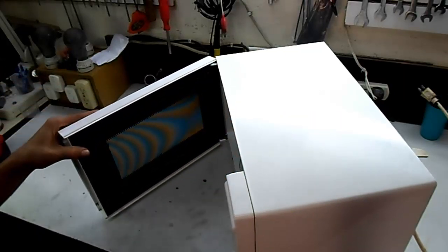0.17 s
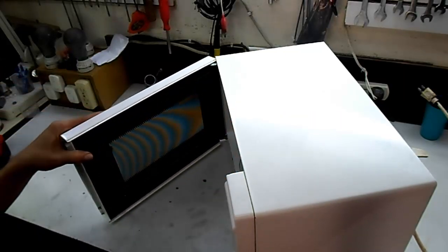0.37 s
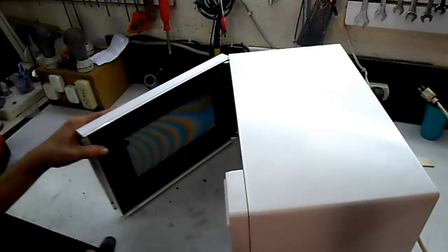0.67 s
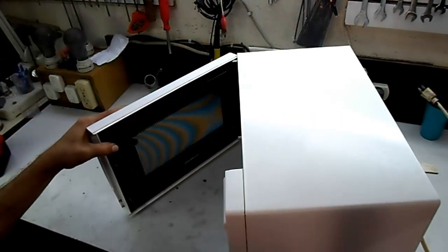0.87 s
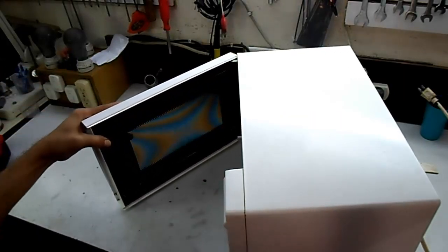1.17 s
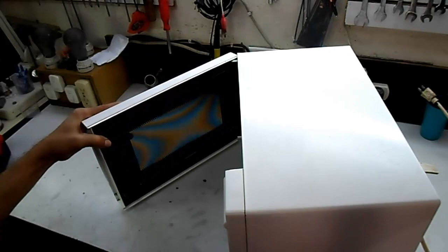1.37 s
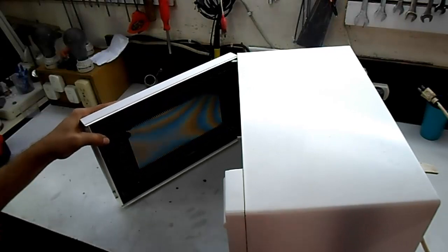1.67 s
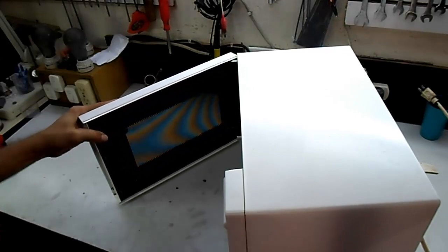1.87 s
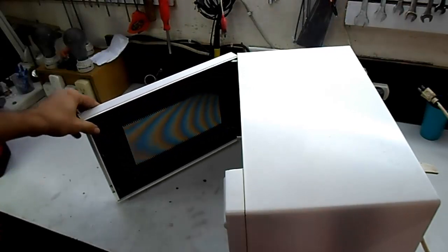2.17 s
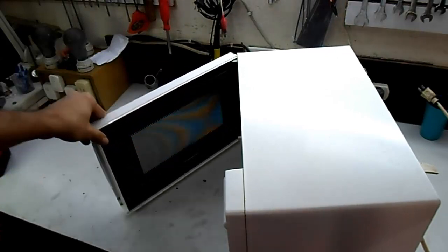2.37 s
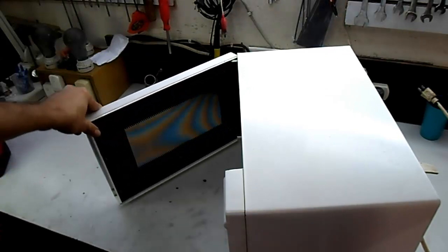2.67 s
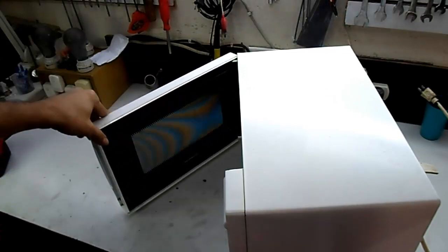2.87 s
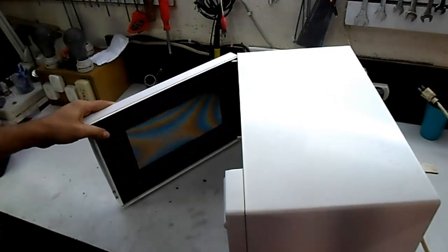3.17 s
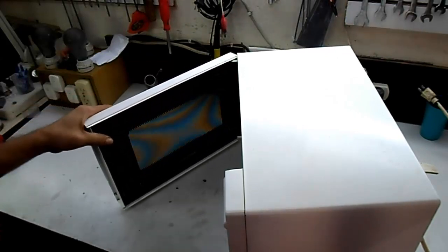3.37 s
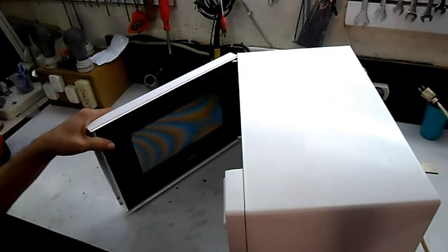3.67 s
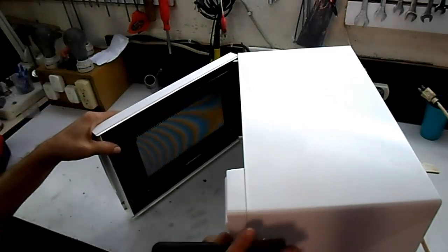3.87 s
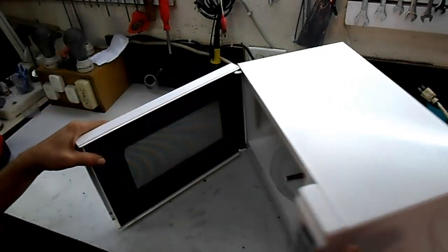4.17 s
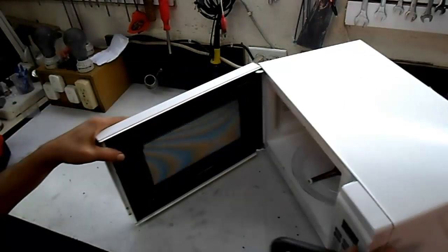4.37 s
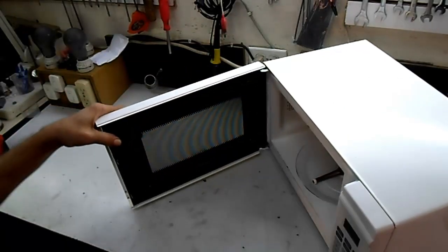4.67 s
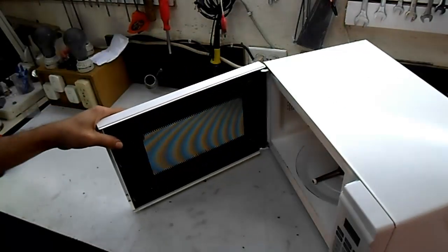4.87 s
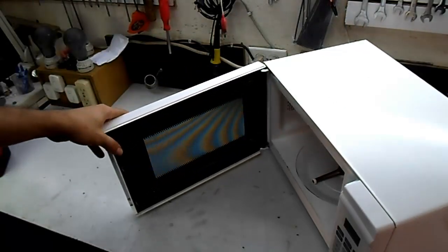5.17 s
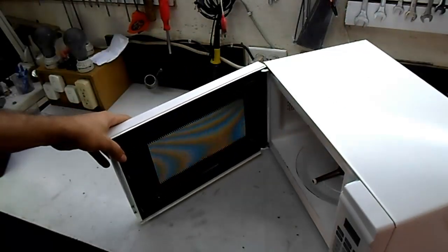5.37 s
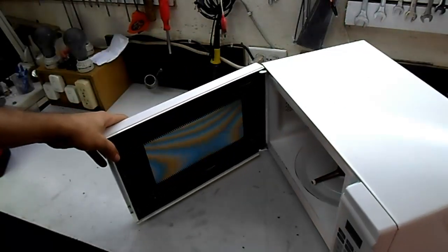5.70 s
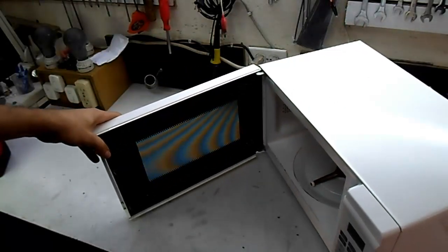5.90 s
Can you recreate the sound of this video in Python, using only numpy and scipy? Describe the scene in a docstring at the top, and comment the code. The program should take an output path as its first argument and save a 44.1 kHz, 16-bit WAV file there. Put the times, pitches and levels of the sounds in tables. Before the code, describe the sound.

A loose microwave door is worked back and forth on a workbench, with hollow low clunks, rattling panels, plastic clicks and gritty sliding.

```python
"""A microwave oven with a loose door is handled on a workbench in a small workshop.
Each clunk of the door is a short judder of blows that rings decaying modes of its panel and hollow case.
Hard plastic and latch parts click in bursts of coloured noise; dry rasps are noise in a narrow resonance.
Things rub and slide as the oven is turned: dense tiny slips, shaped by the speed of each slide.
A short diffuse echo surrounds it; a close, hissy microphone hears it over a low room rumble."""
import sys
import numpy as np
from scipy import signal
from scipy.fft import rfft, irfft, next_fast_len
from scipy.io import wavfile
from scipy.ndimage import uniform_filter1d

SR = 44100
rng = np.random.default_rng(int(sys.argv[2]) if len(sys.argv) > 2 else 0)


def to_wav(s):
    """Save 16-bit WAV."""
    ch = np.atleast_2d(s).T  # columns
    pcm = np.round(np.clip(ch, -1, 1) * 32767)  # PCM
    wavfile.write(sys.argv[1], SR, pcm.astype(np.int16))


N = 266187
TIME = np.arange(N) / SR
RING = TIME[:SR]  # one second for a blow to die away

# Resonances; columns: pitch_hz, level_db (relative), t60_s (time to fall by 60 dB)
# door panel and hollow case
BODY_MODES = [(82.66, -13, 0.84), (122.4, -3.5, 0.47), (141.2, -9.5, 0.26), (157.9, -4, 0.39),
              (199.6, -5, 0.29), (215.3, -5, 0.2), (231, -6.5, 0.24), (246.6, -5.5, 0.11),
              (286.1, 1.5, 0.11), (325.3, -4.5, 0.16), (343.3, -3.5, 0.11), (370, -18, 0.57),
              (433, -28, 0.16), (462, -5.5, 0.25), (487, -21, 0.19), (520, -21, 0.39), (560, -21, 0.11),
              (592, -13, 0.62), (669, -14, 0.28), (702, -25, 0.32), (810, -28, 0.45)]
# thin sheet-metal cover
COVER_MODES = [(800, -6, .2), (870, -4, .25), (1108, -7, .18), (1202, -7, .15), (1297, -7, .14),
               (1352, -3, .15), (1457, -6, .15), (1570, -7, .14), (1640, -5, .1), (1803, -7, .16),
               (2190, -9, .1)]
# metal latch
LATCH_MODES = [(4470, 5, .06), (4890, 8, .09), (4640, 1, 0.2), (5230, -9, 0.09), (5380, -1, 0.11),
               (6300, -1, .04), (9150, -3, .1), (9900, 3, .06), (10100, 10, 0.045), (12100, 7, 0.067),
               (12950, -2, .12)]

# Spectra, relative since the noise is levelled afterwards; columns: pitch_hz, level_db (per Hz)
# low rumble of the room
ROOM_TONE = [(10, 2), (27, 3.5), (50, -10), (62, 2), (85, -14), (120, -21), (250, -21.5), (500, -23.5),
             (1000, -27.5), (2000, -34), (4000, -41.5), (16000, -68)]
# fine hiss of a slide, also used for the microphone hiss
HISS_TONE = [(400, -5), (1500, -2.5), (3000, 0.5), (5200, -0.5), (6800, 0.5), (8800, 5), (10000, 1),
             (13000, 1), (16000, -6)]
# coarse, grainy scrape of a slide
SCRAPE_TONE = [(110, -18), (200, -5), (450, 6.5), (800, 2), (1300, 1), (2000, 0), (2500, -4), (3300, -10.5),
               (6000, -26.5), (16000, -53)]
# slips in the hinge
SHUDDER_TONE = [(40, -7.5), (200, 4), (400, -2), (550, -2.5), (3000, -29)]
# rattle of the thin panels
RATTLE_TONE = [(110, -18), (200, 5), (350, 2), (600, 3.5), (850, -5.5), (1100, -9.5), (1600, -12),
               (2400, -18.5), (3200, -23), (4500, -42), (9000, -31), (16000, -50)]
# sharp tick of hard parts
TICK_TONE = [(500, -43), (2000, 10), (4000, 8.5), (6500, 4.5), (9000, 14.5), (13000, 7), (16000, 1)]
# echo from bench and walls
ECHO_TONE = [(60, -35), (300, -5), (700, 3), (2000, -7.5), (16000, -8.0)]
# hollow clack around its own pitch; columns: pitch_multiple (ratio), level_db (per Hz)
CLACK_TONE = [(.15, -31), (.4, -1), (.75, 3.5), (1.3, -0.5), (1.9, -8), (2.7, -13.5), (4.5, -24), (14, -56)]

# Events; their levels are relative, trimmed again in the mix
# door and feet slide; columns: top_speed_s, speeding_up_s, slowing_down_s,
# fine_hiss_db, coarse_scrape_db, panel_shudder_db
SLIDES = [(.11, 0.17, 0.12, -35.5, -29, -43), (.23, 0.12, 0.055, -37, -28.5, -45),
          (.36, 0.076, 0.13, -40.5, -37, -24.5), (.6, 0.19, 0.16, -38, -48, -43),
          (.96, 0.11, 0.086, -37, -38.5, -43), (1.06, 0.059, 0.044, -53, -33, -37.5),
          (1.38, 0.32, 0.054, -44, -40.5, -35.5), (1.48, 0.058, .05, -43, -46, -34.5),
          (1.62, 0.13, 0.085, -39, -67, -44.5), (1.87, 0.16, .12, -40, -43, -39),
          (2.26, 0.086, .04, -46, -61, -60), (2.369, 0.073, 0.069, -38.5, -31.5, -28),
          (2.7, 0.23, 0.19, -53.5, -52, -42), (3.03, 0.039, 0.098, -48, -46, -44),
          (3.21, 0.033, 0.076, -40.5, -33, -23), (3.4, .08, 0.43, -51, -62, -36.5),
          (3.7, 0.13, 0.15, -43.5, -41.5, -62), (4.068, 0.23, 0.12, -42.5, -52.5, -55),
          (4.26, 0.2, 0.19, -49, -40, -30), (4.4, 0.19, 0.26, -35, -34.5, -51),
          (4.78, 0.3, 0.12, -37, -38.5, -31.5), (4.87, 0.084, 0.061, -36, -30.5, -27),
          (5.07, 0.099, 0.066, -48, -60, -37), (5.34, 0.23, 0.099, -44, -44, -36),
          (5.55, 0.082, .09, -50.5, -65, -39.5), (5.68, 0.024, .11, -66, -65, -34.5),
          (5.99, 0.092, .15, -49, -49.5, -43.5)]
# the door clunks and judders in its hinge; columns: start_s, level_db, swell_s, length_s,
# contact_hz (pitch the contact favours), reach_octaves, case_thud_db, frame_knock_db, panel_rattle_db
CLUNKS = [(.001, -10, 0.00078, 0.026, 291, 1.0, -20, -2.5, -20),
          (0.074, -17, .001, 0.037, 255.5, .3, -30, -4, -32),
          (0.171, -18, .001, 0.053, 227.7, .13, -28, 4.5, -27.5),
          (0.302, -7, 0.014, 0.046, 274.5, .45, -5, -4.5, -16.5),
          (0.401, -14, .001, 0.061, 263.2, 0.18, 0.5, -18, -28),
          (0.647, -24.5, 0.00093, 0.15, 235, 0.32, -22, -10, -58),
          (0.914, -12.5, 0.00082, 0.044, 227, 0.1, -13, -6.5, -28),
          (1.232, -14.5, 0.0033, 0.038, 250.3, 0.43, -20, 3, -27.5),
          (1.321, -23, 0.00072, .065, 228, 0.13, -5.5, -17, -50),
          (1.854, -18, 0.02, 0.034, 270, 0.08, -24, -40, -24),
          (2.284, -8, 0.041, 0.082, 260.6, 0.47, -4.5, -15, -21.5),
          (2.631, -32, .001, 0.018, 245, 0.17, -14, 1, -49),
          (3.166, -5, 0.00086, 0.058, 259.4, .35, -7, -4, -19),
          (3.277, -16, .001, 0.012, 169.2, 0.11, -20, -24, -35),
          (3.525, -25.5, .001, 0.019, 247, 0.6, -10, -11, -35),
          (4.126, -22.5, 0.00087, 0.047, 213, 0.56, -7, -11, -24.5),
          (4.591, -24.5, 0.025, 0.11, 215.5, .2, -15, -29, -53),
          (4.693, -14.5, 0.015, 0.036, 202.4, 0.069, -28, -8.5, -34),
          (4.783, -11, 0.022, .045, 208, 0.26, -10, -17, -23),
          (4.915, -24.5, 0.00093, 0.087, 206, 0.48, 0.5, -9, -38.5),
          (5.262, -23.5, 0.0091, 0.071, 196.5, .5, -6, 3, -31),
          (5.299, -8.5, 0.014, 0.047, 195.6, 0.14, -16.5, -9.5, -26)]
# hard parts tap each other; columns: start_s, clack_db, clack_hz, tick_db
CLICKS = [(.316, -20, 780, -37), (.635, -31, 780, -39), (0.791, -34.5, 825, -41), (1.143, -32, 970, -29),
          (1.17, -39, 1010, -38), (2.049, -45, 1100, -35.5), (2.152, -66, 1500, -39.5),
          (2.263, -43, 1300, -33.5), (2.718, -31.5, 1224, -42), (2.866, -34, 1376, -42),
          (3.166, -28.5, 890, -60), (3.338, -40, 1310, -44), (3.626, -64, 990, -40),
          (3.651, -37.5, 850, -61), (3.669, -33.5, 1210, -31), (3.746, -36.5, 910, -37.5),
          (4.126, -22.5, 1310, -48), (4.155, -27, 1290, -52), (4.445, -29.5, 1380, -60),
          (5.078, -41, 900, -33), (5.192, -40, 835, -41), (5.335, -35, 634, -30.5),
          (5.796, -50, 1100, -33.5), (5.817, -44, 1100, -34), (5.943, -55, 1500, -38)]
# dry hinge and feet rasp; columns: start_s, length_s, level_db (before its swell), pitch_hz, width_hz
RASPS = [(1.019, 0.092, -38, 2230, 170), (1.438, 0.13, -44.5, 2350, 220), (3.5, 0.12, -45.5, 490, 59.7),
         (4.436, 0.048, -27.5, 1360, 400)]

ROOM_DB, MIC_HISS_DB = -32.5, -53
SLIDE_SHAPE = 1.03  # of the speed around its top: 1 pointed, 2 rounded
REBOUND_S, REBOUND_SCATTER = 0.02, 0.22  # typical gap between blows of a judder, its scatter as a share
REBOUND_DB, REBOUND_SPREAD_DB = -3, 0.7  # rebounds against the first blow, scatter of all blows
SETTLE_S, PUSH_S = 0.0096, 0.0033  # time constants: the judder dies away, a soft contact takes up the load
SOFT_HZ = 398  # the blunt contact hardly moves modes above this
THUD_HZ = 100.5  # the case thuds below this
FRAME_HZ, FRAME_REACH = 340, 0.13  # the frame knocks around this pitch, reach in octaves
RATTLE_DB = 3.5  # trim for every panel rattle
LATCH_S, LATCH_DB = 1.143, -35.5  # the latch is struck squarely once
TOP_HZ = 15800  # the microphone cuts above this


def undb(db):
    """Decibels to gain."""
    return 10 ** (np.asarray(db) / 20)


def add(track, s, sound):
    """Mix a sound into the track at a time in seconds."""
    part = track[max(int(s * SR), 0):][:len(sound)]
    part += sound[:len(part)]


def colour(x, tone):
    """Shape a signal by a spectrum, joined smoothly over log frequency, and level it to rms 1."""
    hz, db = np.transpose(tone)
    size = next_fast_len(len(x))
    f = np.maximum(np.fft.rfftfreq(size, 1 / SR), 1)
    gain = undb(np.interp(np.log(f), np.log(hz), db))
    y = irfft(rfft(x, size) * gain, size)[:len(x)]
    return y / np.std(y)


def noise(tone, size):
    """Coloured noise of rms 1."""
    return colour(rng.standard_normal(size), tone)


def fade(t60):
    """Exponential decay, down 60 dB after t60 seconds."""
    return np.exp(-np.log(1000) * RING / t60)


def modes(table):
    """Resonances ring as one decaying sine each."""
    return np.array([undb(db) * np.sin(2 * np.pi * hz * RING) * fade(t60) for hz, db, t60 in table])


def strike(rings):
    """A blow at a chance spot: each mode answers with its own strength and sign."""
    return rng.standard_normal(len(rings)) @ rings / np.sqrt(len(rings))


def burst(tone, t60, tail_db, tail_t60):
    """Countless close modes: a quick crack and a weaker, longer ring."""
    return noise(tone, len(RING)) * (fade(t60) + undb(tail_db) * fade(tail_t60))


def room_rumble():
    """The room hums along as steady noise, heaviest in the bass."""
    return undb(ROOM_DB) * noise(ROOM_TONE, N)


def microphone_hiss():
    """The microphone adds a faint, steady hiss."""
    return undb(MIC_HISS_DB) * noise(HISS_TONE, N)


def friction(tone, rate, spread_db):
    """Surfaces stick and let go: dense tiny slips of uneven size, at a mean rate per second."""
    slips = rng.random(N) < rate / SR
    sizes = undb(spread_db * np.minimum(rng.exponential(size=N), 4))
    return colour(slips * sizes * rng.standard_normal(N), tone)


def shudder():
    """Small slips in the hinge keep the modes of panel and case murmuring."""
    slips = friction(SHUDDER_TONE, rate=400, spread_db=2.0)
    body = signal.fftconvolve(slips, modes(BODY_MODES).sum(axis=0))[:N]
    return body / np.std(body)


def rubbing(slide_db, scrape_db, shudder_db):
    """The speed of each slide drives a smooth hiss, a grainy scrape and the shudder of the panel."""
    power = np.zeros((3, N))
    for top_s, rise_s, fall_s, *levels_db in SLIDES:
        distance = np.maximum((top_s - TIME) / rise_s, (TIME - top_s) / fall_s)
        speed = np.exp(-distance.clip(0, 10) ** SLIDE_SHAPE)
        power += np.outer(undb(levels_db) ** 2, speed ** 2)
    hiss_level, scrape_level, shudder_level = np.sqrt(power)
    hiss = hiss_level * friction(HISS_TONE, rate=16000, spread_db=0.5)
    scrape = scrape_level * friction(SCRAPE_TONE, rate=3500, spread_db=0.5)
    shake = shudder_level * shudder()
    return undb(slide_db) * hiss + undb(scrape_db) * scrape + undb(shudder_db) * shake


def judder(swell_s, length_s, contact_hz, count=10):
    """(Delay, strength) of blows that swell, hold and settle, in step with the swing of the panel."""
    timing, strength = rng.standard_normal((2, count))
    swings = np.round(REBOUND_S * contact_hz * (1 + REBOUND_SCATTER * timing))
    gaps = np.maximum(swings, 1) / contact_hz  # whole swings, at least one
    delays = np.cumsum(gaps) - gaps[0]
    rise = np.minimum((delays + REBOUND_S) / (swell_s + REBOUND_S), 1)
    settle = np.exp(-np.maximum(delays - length_s, 0) / SETTLE_S)
    force = undb(REBOUND_DB * (delays > 0) + REBOUND_SPREAD_DB * strength)
    return list(zip(delays, rise * settle * force))


def repeat(sound, blows):
    """A sound set off anew by each blow."""
    out = np.zeros(len(sound))
    for delay, size in blows:
        add(out, delay, size * sound)
    return out


def near(mode_hz, hz, reach):
    """Share of each mode: full at a pitch, half at `reach` octaves from it."""
    return 1 / (1 + (np.log2(mode_hz / hz) / reach) ** 2)


def rattle(blows, shake_s, t60, tail_db, tail_t60):
    """Every blow shakes the thin panels afresh; the cracks run together into one crunch."""
    crack = (1 - np.exp(-RING / shake_s)) * (fade(t60) + undb(tail_db) * fade(tail_t60))
    power = repeat(crack ** 2, [(delay, size ** 2) for delay, size in blows])
    return np.sqrt(power) * noise(RATTLE_TONE, len(RING))


def door(body_db, cover_db):
    """Clunks ring the modes near their contact pitch, thud the case, knock the frame, shake thin panels."""
    out, cover = np.zeros(N), modes(COVER_MODES)
    soft = signal.butter(N=6, Wn=SOFT_HZ, fs=SR, output="sos")
    rings = signal.sosfilt(soft, modes(BODY_MODES) * (1 - np.exp(-RING / PUSH_S)))
    mode_hz = np.transpose(BODY_MODES)[0]
    case = 1 / (1 + (mode_hz / THUD_HZ) ** 6)
    frame = near(mode_hz, FRAME_HZ, FRAME_REACH)
    for s, db, swell_s, length_s, contact_hz, reach, thud_db, frame_db, rattle_db in CLUNKS:
        blows = judder(swell_s, length_s, contact_hz)
        share = near(mode_hz, contact_hz, reach) + undb(thud_db) * case + undb(frame_db) * frame
        swings = np.array([repeat(ring, blows) for ring in rings])
        # every mode keeps its share of the energy, however the blows fall
        body = (share * rings.std(axis=1) / swings.std(axis=1)) @ swings
        loudest = np.sqrt(uniform_filter1d(body ** 2, size=SR // 25).max())  # rms over 40 ms
        panels = rattle(blows, shake_s=0.0039, t60=0.076, tail_db=-12, tail_t60=0.35)
        panels += undb(cover_db) * repeat(strike(cover), blows)
        add(out, s, undb(db + body_db) * body / loudest + undb(rattle_db + RATTLE_DB) * panels)
    return out


def latch_ring(waver_hz):
    """The latch sits loosely, so each of its modes wavers as it rings."""
    waver_tone = [(waver_hz, 0), (4 * waver_hz, -30), (16000, -80)]
    return sum(ring * noise(waver_tone, len(RING)) for ring in modes(LATCH_MODES))


def clicks(cover_db, latch_ring_db, spread_s):
    """Plastic clacks ring the cover; the stronger their sharp tick, the more the latch rings along."""
    out, cover, latch = np.zeros(N), modes(COVER_MODES), latch_ring(waver_hz=70)
    bloom = 1 - np.exp(-RING / spread_s)  # the blow needs a moment to spread over the case
    for s, clack_db, clack_hz, tick_db in CLICKS:
        tone = [(multiple * clack_hz, db) for multiple, db in CLACK_TONE]
        hollow = burst(tone, t60=0.12, tail_db=-6.5, tail_t60=0.41)
        clack = bloom * (hollow + undb(cover_db) * strike(cover))
        edge = burst(TICK_TONE, t60=0.015, tail_db=-3.5, tail_t60=0.24)
        tick = edge + undb(latch_ring_db) * latch
        add(out, s, undb(clack_db) * clack + undb(tick_db) * tick)
    add(out, LATCH_S, undb(LATCH_DB) * latch)
    return out


def rasps():
    """Short dry rasps: friction swelling and fading in one narrow resonance."""
    out = np.zeros(N)
    for s, length_s, db, hz, width_hz in RASPS:
        size = int(length_s * SR)
        resonance = signal.iirpeak(hz, hz / width_hz, fs=SR)
        rasp = signal.lfilter(*resonance, rng.standard_normal(size))
        add(out, s, undb(db) * np.hanning(size) * rasp / np.std(rasp))
    return out


def workshop(x, wet_db, t60):
    """Bench and walls return a short, diffuse echo."""
    onset = 1 - np.exp(-RING / 0.00094)
    echo = noise(ECHO_TONE, len(RING)) * fade(t60) * onset
    return x + undb(wet_db) * signal.fftconvolve(x, echo / np.linalg.norm(echo))[:N]


def scene():
    """The oven in the room, over a steady rumble and a faint hiss."""
    oven = rubbing(slide_db=2.0, scrape_db=1.0, shudder_db=1.5)
    oven += door(body_db=-1.97, cover_db=-9)
    oven += clicks(cover_db=2.5, latch_ring_db=-23, spread_s=0.0018)
    oven += rasps()
    floor = room_rumble() + microphone_hiss()
    return (workshop(oven, wet_db=-13.5, t60=0.36) + floor)[None]


def record(dry):
    """The microphone has a deep notch in the treble, clips at full scale and cuts the top."""
    notch = signal.iirnotch(11050, 4.2, fs=SR)
    notched = signal.lfilter(*notch, dry) + 0.038 * dry  # a little leaks through the notch
    heard = np.clip(notched, -1, 1)
    top_cut = signal.ellip(10, 0.2, 80, TOP_HZ, fs=SR, output="sos")
    return signal.sosfilt(top_cut, heard)


dry = scene()
out = record(dry)
to_wav(out)
```